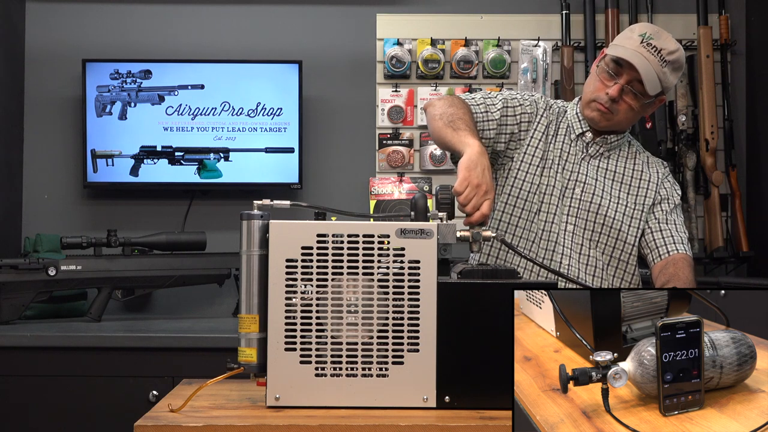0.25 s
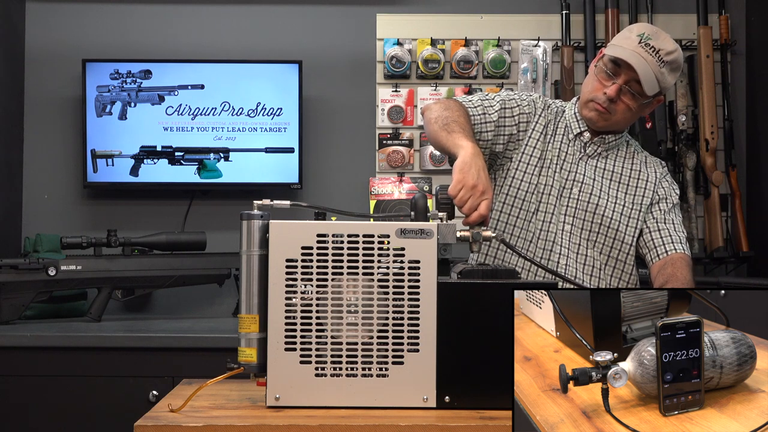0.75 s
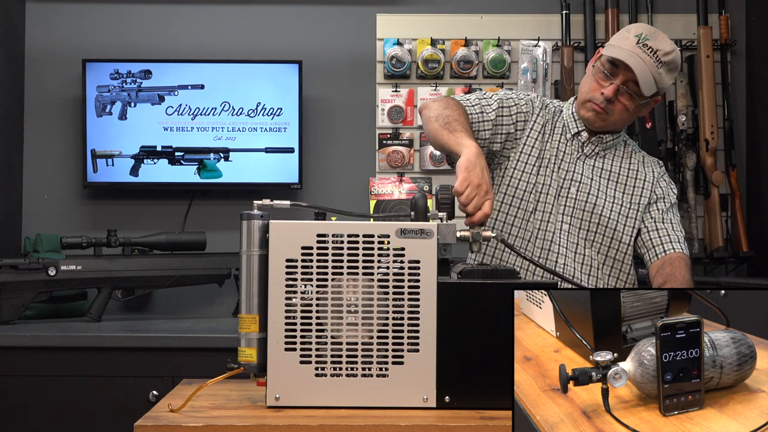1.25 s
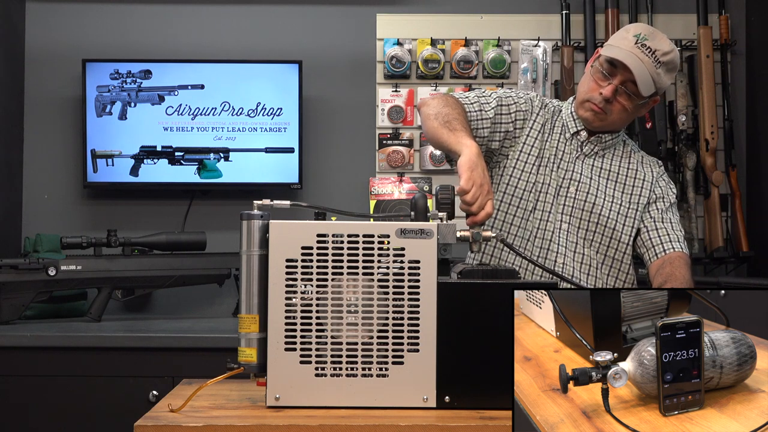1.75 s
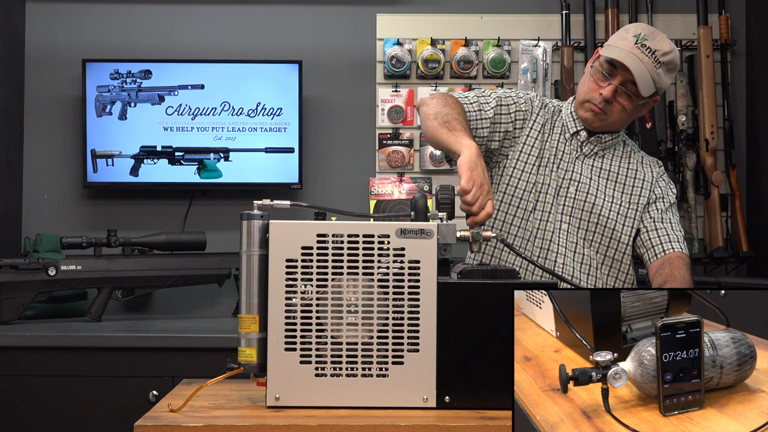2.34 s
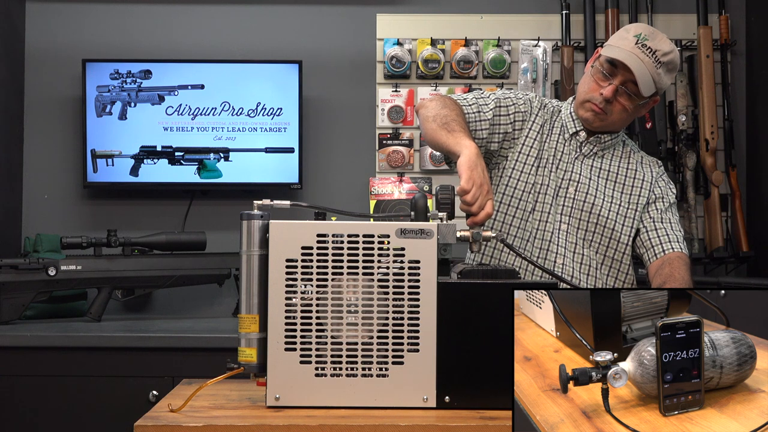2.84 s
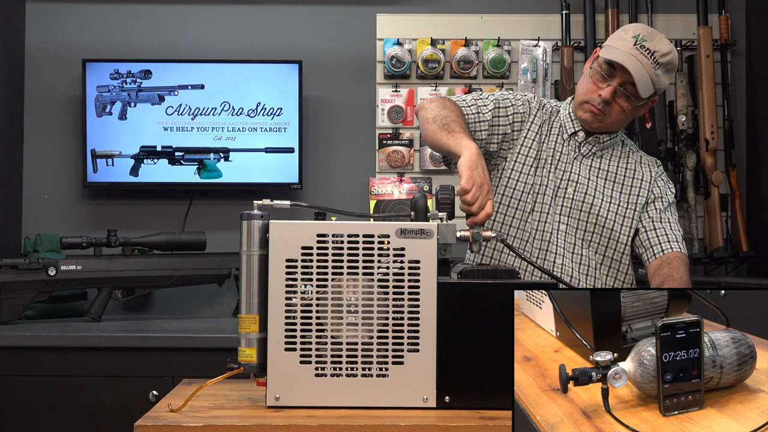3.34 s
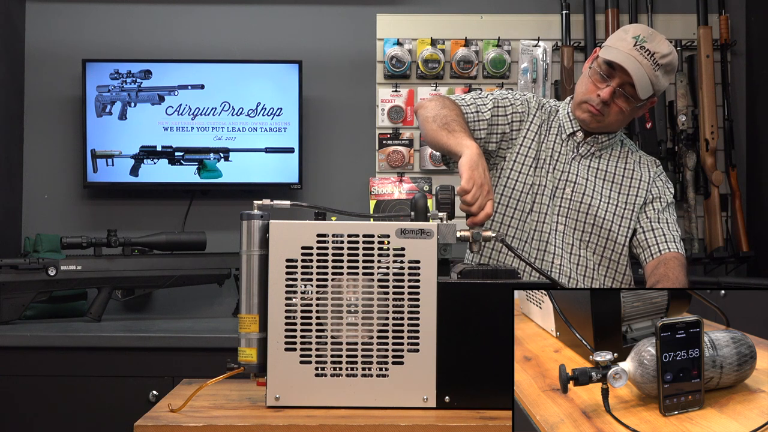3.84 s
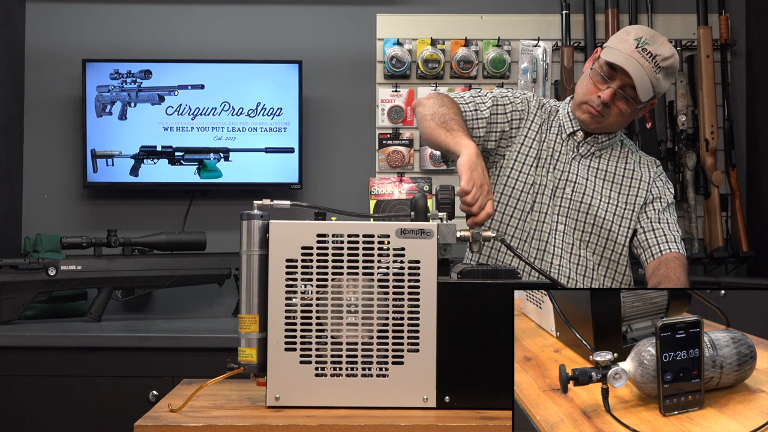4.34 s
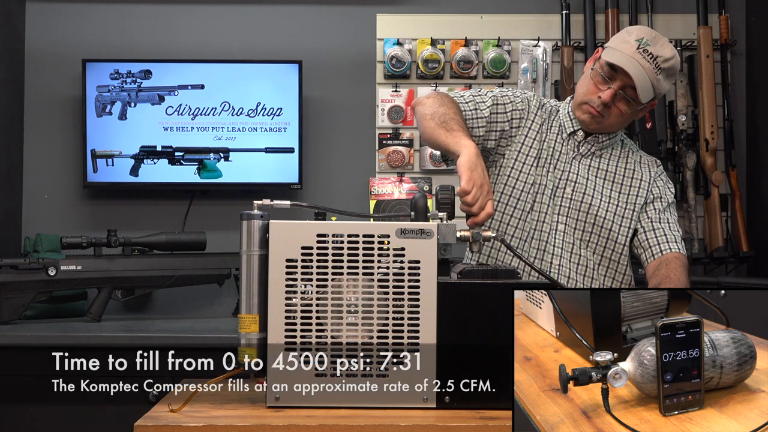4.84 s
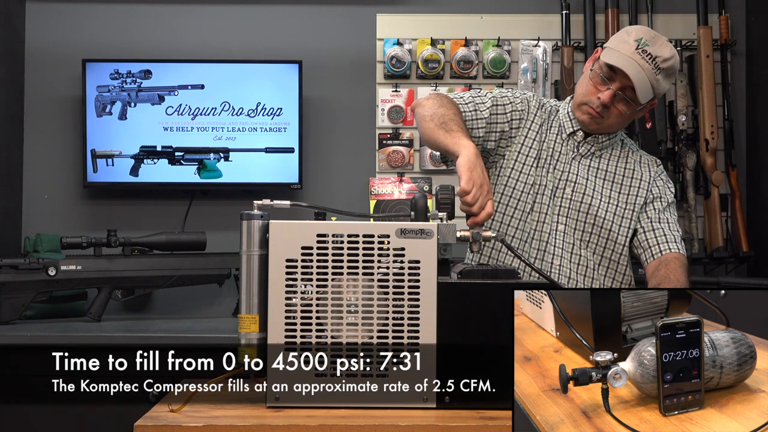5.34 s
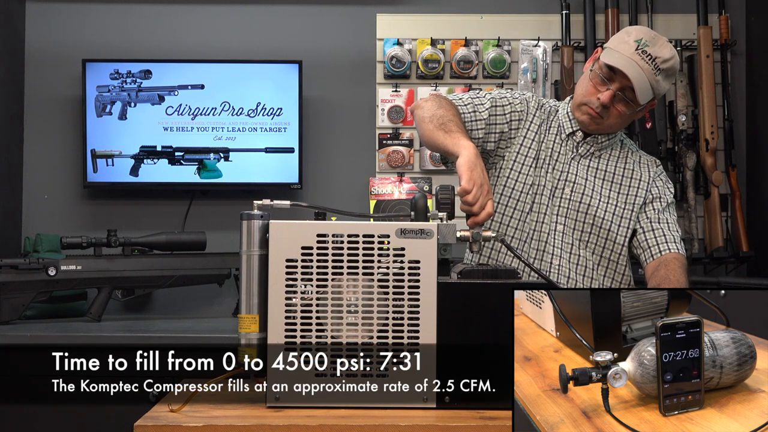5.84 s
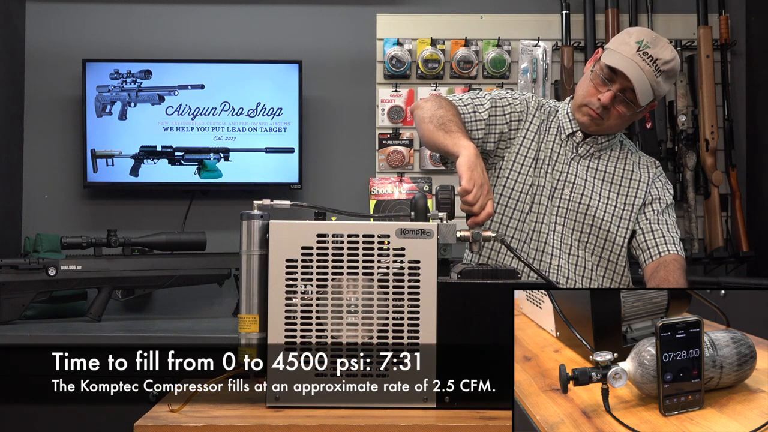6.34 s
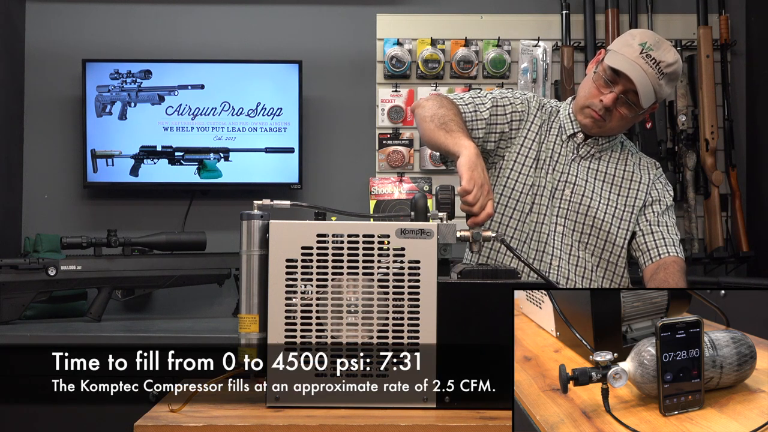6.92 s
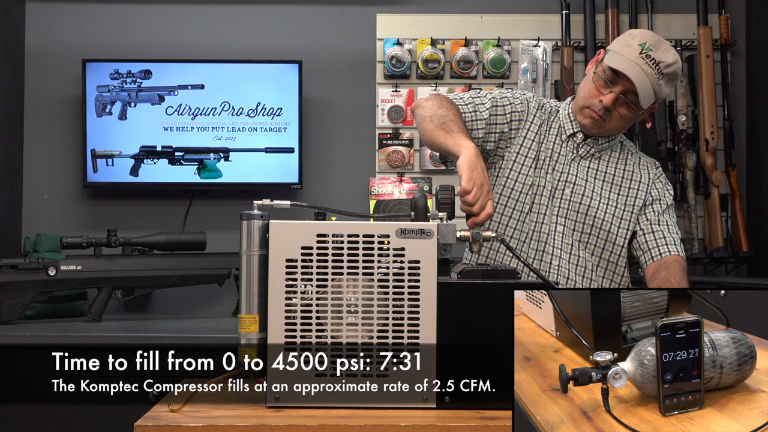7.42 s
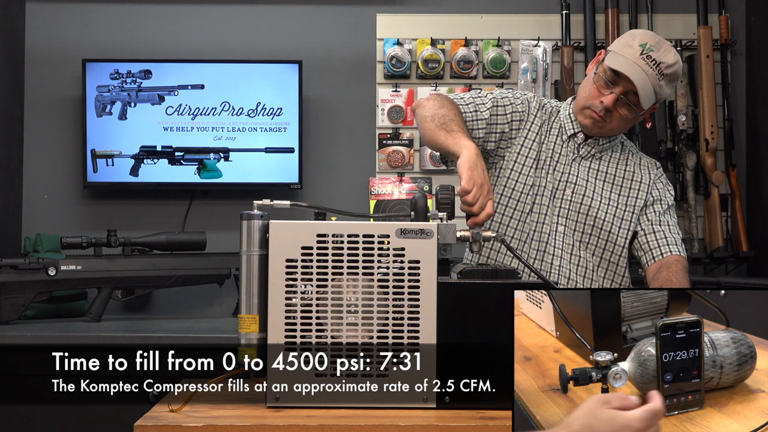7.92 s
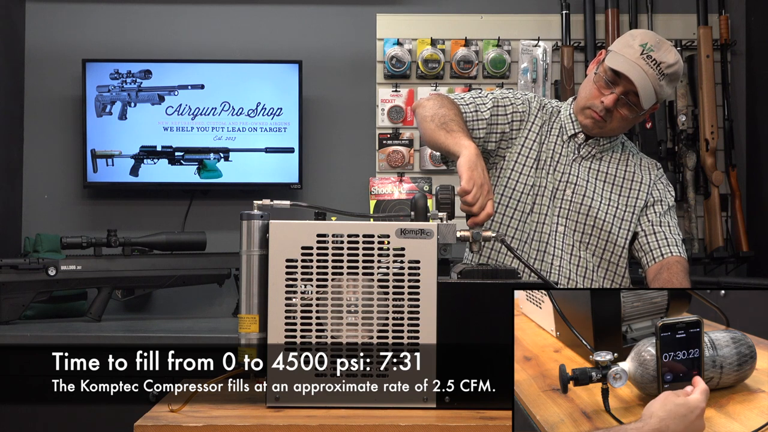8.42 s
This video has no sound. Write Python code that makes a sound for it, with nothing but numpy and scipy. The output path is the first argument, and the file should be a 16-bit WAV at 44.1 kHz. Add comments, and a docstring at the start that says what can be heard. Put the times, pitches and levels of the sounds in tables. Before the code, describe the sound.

In a small shop, a loud, bright jet of compressed air blasts from a bleed valve. It shuts off abruptly after half a second, leaving a thin wavering leak over faint room hum for about a second. The hiss springs back and runs to the end, slowly sagging, swelling in small steps, its noisy whistle and resonances shifting upward. One fairly close microphone, dry with quick reflections.

```python
"""A jet of high-pressure air bleeds from a compressor valve in a small shop, heard by one microphone.
The jet is shaped noise: it sinks as the pressure drains and swells at each nudge of the knob.
It rings in the cavity between valve and hand, whose resonances slide together as the hand turns.
The valve is shut for about a second, leaving a thin leak of shaped noise over the room.
The room is low air noise with two hum lines; bench, case and walls reflect the air sounds."""
import sys
import numpy as np
from scipy import signal
from scipy.fft import rfft, irfft, next_fast_len
from scipy.io import wavfile
from scipy.ndimage import uniform_filter1d

SR = 44100
rng = np.random.default_rng(int(sys.argv[2]) if len(sys.argv) > 2 else 0)


def file_out(sig):
    """Save sig as 16-bit WAV at sys.argv[1]."""
    # one column per channel
    cols = np.atleast_2d(sig).T
    # limit, then scale
    lim = np.clip(cols, -1, 1)
    pcm = np.round(lim * 32767).astype(np.int16)
    wavfile.write(sys.argv[1], SR, pcm)


N = 382788

# Background, room air: [f/Hz, level/dB per Hz]
ROOM_AIR = [(15, -89), (35, -92), (55, -97), (80, -101), (200, -104), (1000, -112), (15000, -125)]
# Background, electrical hum lines: [f/Hz, level/dB rms]
HUM_LINES = [(60, -80), (235, -81)]
# Leak through the shut valve, before its resonances: [f/Hz, level/dB per Hz]
LEAK_SPECTRUM = [(100, -103), (650, -98), (1100, -100), (2100, -96.5), (3100, -89), (5000, -90.5),
                 (7000, -90.5), (9500, -96), (10800, -103), (11800, -104), (12600, -110), (15600, -109)]
# Resonances (+) and dips (-) of the leak: [f/Hz, width/Hz, level/dB]
LEAK_RESONANCES = [(1580, 120, 7), (2370, 160, 8), (2810, 94, 13.5), (3025, 240, 14), (3550, 190, 15),
                   (3840, 100, 8), (4520, 170, 5), (5200, 490, 7), (6050, 200, -2), (7400, 200, 2),
                   (7950, 400, -7), (8680, 300, 10), (9560, 400, 9.5)]
# Turbulence of the open jet, before resonances and flow: [f/Hz, level/dB per Hz]
JET_SPECTRUM = [(100.0, -88.5), (250.0, -86.5), (500.0, -79.0), (900.0, -74.0), (1400.0, -69),
                (2200.0, -69.5), (3500.0, -63.5), (5000.0, -62), (7000.0, -58.5), (8200.0, -64),
                (10000.0, -62.0), (12500.0, -64), (15600.0, -71.5)]
# Fixed resonances (+) and dips (-) of the fitting and the case: [f/Hz, width/Hz, level/dB]
BODY_RESONANCES = [(550.0, 50.0, 1.1), (670.0, 70.0, 1.9), (900.0, 110.0, 2.0), (1460.0, 440.0, 4.3),
                   (1910.0, 70.0, 1.8), (2340.0, 140.0, 4.1), (2550.0, 110.0, -1.4), (2820.0, 140.0, 2.7),
                   (3170.0, 90.0, 1.4), (3290.0, 100.0, -1.3), (3600.0, 170.0, 3.2), (4030.0, 110.0, -1.8),
                   (4300.0, 220.0, 1.4), (4800.0, 260.0, -2.4), (5840.0, 170.0, 1.7), (6140.0, 170.0, -3.3),
                   (7360.0, 260.0, 0.7), (7710.0, 200.0, -1.5), (8490.0, 220.0, 1.5), (9410.0, 410.0, 2.2),
                   (10610.0, 380.0, -3.6), (11750.0, 220.0, 2.0), (13540.0, 210.0, -1.2)]
# Resonances (+) and notches (-) of the cavity between valve and hand:
# [f at turn 0/Hz, f at turn 1/Hz, width/Hz, level at turn 0/dB, at half turn/dB, at turn 1/dB]
CAVITY_RESONANCES = [(2140, 3690, 280, -3, 3, -7.5), (2500, 3110, 200, 4, -4, -4),
                     (2615, 2300, 600, -6, -2, 1), (2740, 4320, 350, 6.5, 3, 2),
                     (3620, 4700, 610, 4, 3, 3.5), (5170, 6850, 1180, 12, 7, 8.5),
                     (5740, 6970, 470, .2, 7, -6.5), (5890, 8000, 520, -2.5, -0.5, -5.5),
                     (6270, 9200, 500, 6.5, 1, -3.5), (7440, 9260, 1340, 8.5, 11.5, 14),
                     (7850, 10200, 620, -3.5, -6.5, -3), (8520, 11330, 860, 14.5, 4.5, -5.5),
                     (8920, 13700, 890, -5.3, -1, -6), (9330, 11630, 640, 10.5, 9, 1.5),
                     (10450, 13000, 880, 9, 2.5, -2.5), (11650, 17200, 830, 4, -1.5, 5),
                     (13300, 14800, 750, 0, 8, -1)]
# How far the hand has turned with the knob; it slips forward and back once: [t/s, turn 0-1]
HAND_TURN = [(1.9, 0.04), (3.1, 0.1), (3.65, 0.13), (3.75, 0.34), (3.83, 0.54), (3.92, 0.54), (4.03, 0.28),
             (4.3, 0.19), (5, 0.34), (5.6, 0.39), (6.1, 0.62), (6.9, 0.71), (7.3, 0.88), (7.6, 1.0),
             (8.68, 0.98)]
# Nudges that open the knob further: [t/s, length/s, gain/dB]
KNOB_NUDGES = [(0.05, 0.37, 1.28), (2.346, 0.048, 1.91), (3.1, 0.2, 0.9), (4.52, 0.063, 3.5),
               (5.47, 0.082, 2.5), (5.906, 0.35, 3.0), (6.8, 0.77, 8.5)]
# Lift of the whistle band, before its flutter: [t/s, level/dB]
WHISTLE_LEVEL = [(1.9, 2.5), (3.1, 4), (3.7, 4), (3.85, 6), (4.05, 5.5), (4.8, 10.1), (5.5, 13), (6.1, 9.5),
                 (6.9, 4), (7.6, -2.0), (8.68, 1)]
# Lift of the low roar: [t/s, level/dB]
ROAR_LEVEL = [(0, 5), (2.3, 4.5), (2.5, 3.5), (4.3, 4.5), (6.3, 4.5), (6.9, 2.5), (7.5, -3.0), (8.68, -2.2)]
# Lift of the treble: [t/s, level/dB]
TREBLE_LEVEL = [(0, 2), (1.9, 0), (3.2, 1.1), (4.3, 4), (4.9, 1.3), (5.55, 1.5), (6.2, 5.5), (6.55, 5),
                (6.82, 10.5), (7.25, 2.5), (7.8, 4), (8.3, 7.2)]
# Side tones (+) and hollows (-) that come and go in the hiss:
# [start t/s, end t/s, f/Hz, width/Hz, level/dB]
HISS_SIDE_TONES = [(-.1, .75, 14420, 509.5, 9), (-.1, .75, 9400, 900, 2), (3.7, 4.02, 9400, 550, -6),
                   (3.7, 4.02, 6950, 450, -6), (3.7, 4.02, 5100, 600, -4), (3.95, 4.65, 6250, 380, -5),
                   (4.05, 4.95, 11100, 600, 3), (4.52, 5.05, 4360, 520, 5), (5.4, 7.15, 4400, 640, 5.5),
                   (6.7, 7.35, 11100, 700, 3.5), (7.35, 8.1, 12100, 700, 4)]
SIDE_TONE_FADE_S = 0.11

# the valve is shut, then opened again
SHUT_S, SHUT_DB_PER_S = 0.64, 400
REOPEN_S, REOPEN_RISE_S = 1.791, 0.036
# the jet weakens steadily while air flows
START_DB, SAG_DB_PER_S = -0.56, 3
# a noisy whistle at the valve seat, which rises with the turn of the hand
WHISTLE_HZ, WHISTLE_TURNED_HZ, WHISTLE_SPREAD_HZ = 9080, 9210, 820
TOP_HZ = 15750  # the recorder's upper limit

# spectra are shaped in overlapping frames: rows are frequencies, columns are moments
FRAME, HOP = 1024, 256
TIME = np.arange(N) / SR
FRAME_S = np.arange(N // HOP + 2) * HOP / SR
FREQ = np.fft.rfftfreq(FRAME, 1 / SR)[:, None]


def undb(db):
    """Decibels to gain."""
    return 10 ** (np.asarray(db) / 20)


def curve(rows):
    """The value of a (time, value) table at each frame, joined by straight lines."""
    s, value = np.transpose(rows)
    return np.interp(FRAME_S, s, value)


def colour(points):
    """A spectrum in dB, joined by straight lines on a log-frequency axis."""
    hz, db = np.transpose(points)
    return np.interp(np.log(FREQ + 1), np.log(hz), db)


def resonance(hz, width_hz, db):
    """A bell-shaped lift or dip in dB."""
    return db / (1 + 2 * ((FREQ - hz) / width_hz) ** 2) ** 2


def walk(rate):
    """Smooth chance of spread 1 that changes about rate times a second."""
    smooth = np.sinc(np.linspace(-1, 1, 2 * int(SR / HOP / rate) + 3))
    smooth = smooth / np.linalg.norm(smooth)
    chance = rng.standard_normal(len(FRAME_S))
    return signal.fftconvolve(chance, smooth, "same")


def noise(db):
    """Turbulent noise whose density (dB per Hz) may move in time."""
    # scaled to unit power per Hz
    white = rng.standard_normal((len(FRAME_S) - 1) * HOP) * np.sqrt(SR / 2)
    spectra = signal.stft(white, nperseg=FRAME, noverlap=FRAME - HOP)[2]
    shaped = signal.istft(spectra * undb(db), nperseg=FRAME, noverlap=FRAME - HOP)[1]
    return shaped[:N]


def room_tone():
    """The background at the microphone: low air noise and a faint electrical hum of steady sines."""
    hum = 0
    for hz, rms_db in HUM_LINES:
        peak = undb(rms_db) * np.sqrt(2)
        hum = hum + peak * np.sin(2 * np.pi * hz * TIME)
    return noise(colour(ROOM_AIR)) + hum


def shop(x, near_db=-11, near_t60=0.039, wall_db=-11, wall_t60=0.31):
    """Direct sound, quick reflections from bench and case, and the short tail of the walls."""
    t = TIME[:SR // 2]
    response = signal.unit_impulse(len(t))
    # the delays stand for about 0.7 m and 2.7 m of extra path to the microphone
    for db, t60, delay_s in ((near_db, near_t60, 0.002), (wall_db, wall_t60, 0.008)):
        decay = np.exp(-np.log(1000) * t / t60)  # 60 dB down after t60 seconds
        tail = rng.standard_normal(len(t)) * decay * (t > delay_s)
        response = response + undb(db) * tail / np.linalg.norm(tail)
    # diffuse reflections ripple the spectrum finely but leave its broad balance even
    size = next_fast_len(N + SR)
    transfer = rfft(response, size)
    broad_power = uniform_filter1d(np.abs(transfer) ** 2, size=1000)
    return irfft(rfft(x, size) * transfer / np.sqrt(broad_power), size)[:N]


def leak(waver_db=-0.5):
    """A thread of air past the valve seat: wavering noise coloured by narrow resonances."""
    db = colour(LEAK_SPECTRUM) + sum(resonance(*mode) for mode in LEAK_RESONANCES)
    return noise(db + waver_db * walk(7.5))


def valve():
    """Gain of the jet: it dies quickly when the valve is shut and springs back when it is opened."""
    closing = undb(-SHUT_DB_PER_S * np.maximum(TIME - SHUT_S, 0))
    opening = 1 - np.exp(-np.maximum(TIME - REOPEN_S, 0) / REOPEN_RISE_S)
    return closing + opening


def flow_db():
    """Strength of the jet: it sags while air escapes, and each nudge of the knob lifts it for good."""
    shut_for_s = np.clip(FRAME_S - SHUT_S, 0, REOPEN_S - SHUT_S)
    flowing_s = FRAME_S - shut_for_s
    nudged_db = 0
    for start_s, length_s, gain_db in KNOB_NUDGES:
        nudged_db = nudged_db + gain_db * np.clip((FRAME_S - start_s) / length_s, 0, 1)
    return START_DB - SAG_DB_PER_S * flowing_s + nudged_db


def slide(from_hz, to_hz, turn):
    """A pitch that moves by equal intervals as the hand turns."""
    return from_hz * (to_hz / from_hz) ** turn


def cavity(turn):
    """The turning hand shrinks the cavity, so its resonances slide together, nearly all upward."""
    db = 0
    for from_hz, to_hz, width_hz, *lifts_db in CAVITY_RESONANCES:
        lift_db = np.interp(turn, (0, 0.5, 1), lifts_db)
        db = db + resonance(slide(from_hz, to_hz, turn), width_hz, lift_db)
    return db


def whistle(turn, flutter_db=1.33):
    """A noisy whistle, a lifted band of the hiss, that keeps catching and losing its hold on the jet."""
    lift_db = curve(WHISTLE_LEVEL) + flutter_db * walk(45)
    return resonance(slide(WHISTLE_HZ, WHISTLE_TURNED_HZ, turn), WHISTLE_SPREAD_HZ, lift_db)


def side_tones():
    """Lifts and dips in dB that fade in, colour the hiss briefly and let go."""
    db = 0
    for start_s, end_s, hz, width_hz, lift_db in HISS_SIDE_TONES:
        to_nearest_end_s = np.minimum(FRAME_S - start_s, end_s - FRAME_S)
        fade = np.clip(to_nearest_end_s / SIDE_TONE_FADE_S, 0, 1)
        db = db + resonance(hz, width_hz, lift_db * fade)
    return db


def jet(flutter_db=0.48, eddy_db=0.34):
    """The escaping air: broad turbulence, shaped by fixed and moving resonances."""
    turn = curve(HAND_TURN)
    # large eddies roar at the low end of the spectrum, small ones sizzle at the top
    low = 1 / (1 + (FREQ / 4200) ** 6)
    high = 1 - 1 / (1 + (FREQ / 11500) ** 12)
    db = colour(JET_SPECTRUM) + sum(resonance(*mode) for mode in BODY_RESONANCES)
    db = db + flow_db() + low * curve(ROAR_LEVEL) + high * curve(TREBLE_LEVEL)
    db = db + cavity(turn) + whistle(turn) + side_tones()
    # the whole jet flutters; large and small eddies also vary on their own
    db = db + flutter_db * walk(40)
    db = db + eddy_db * (low * walk(40) + high * walk(12))
    return noise(db) * valve()


def scene(jet_db=0, leak_db=0):
    """Jet and leak sound in the shop over the room tone; one microphone feeds both channels."""
    escaping_air = undb(jet_db) * jet() + undb(leak_db) * leak()
    mono = shop(escaping_air) + room_tone()
    return np.array([mono, mono])


def record(dry):
    """The recorder cuts the top with a steep low-pass."""
    top_cut = signal.ellip(12, 0.1, 80, TOP_HZ, fs=SR, output="sos")
    return signal.sosfilt(top_cut, dry)


dry = scene()
out = record(dry)
file_out(out)
```